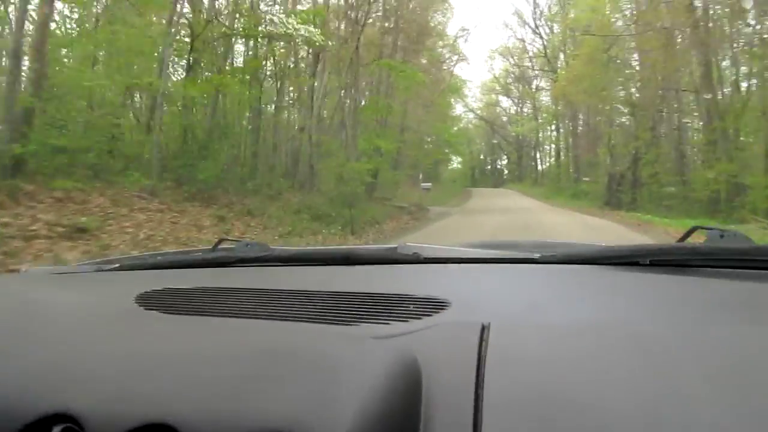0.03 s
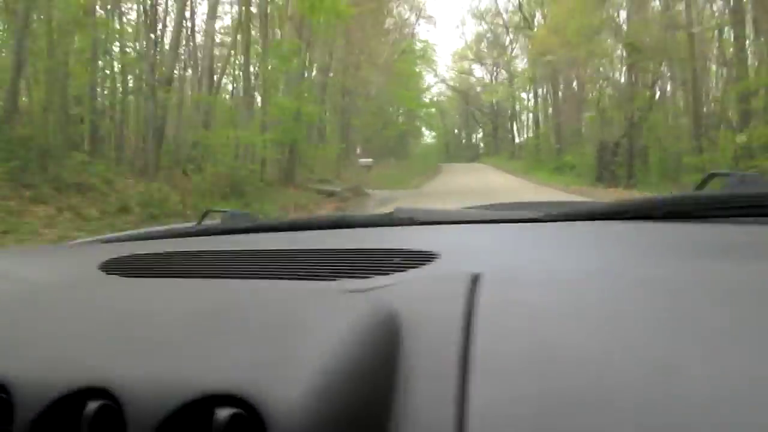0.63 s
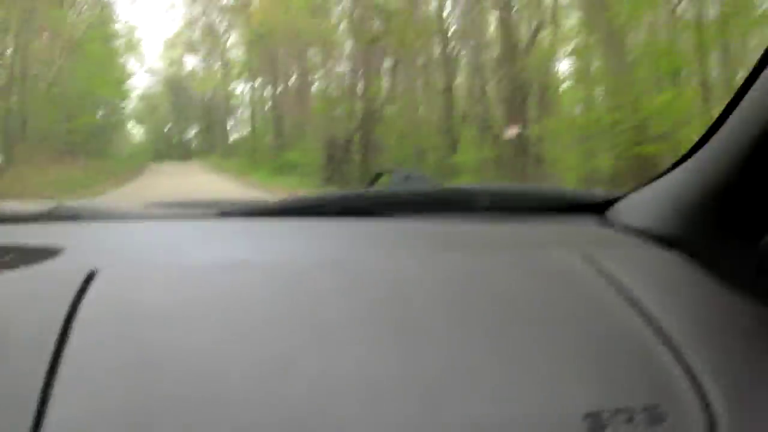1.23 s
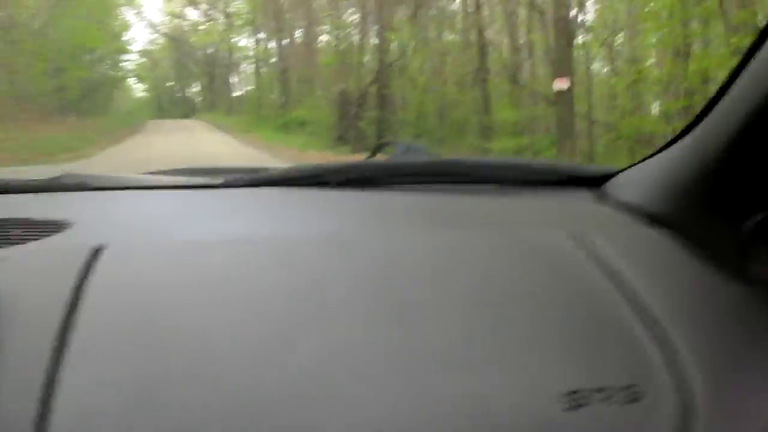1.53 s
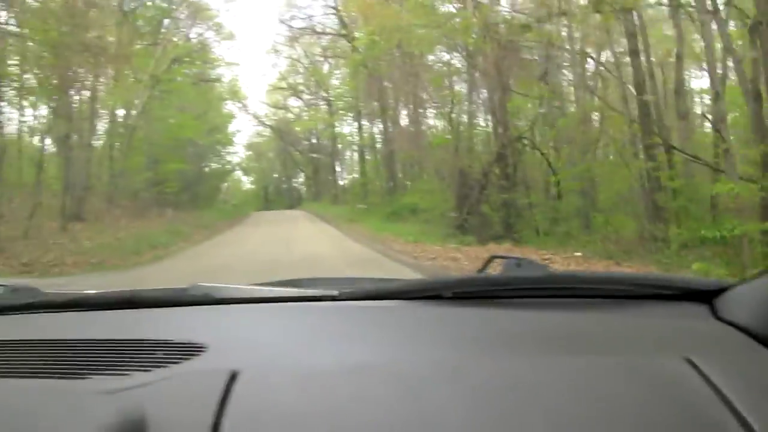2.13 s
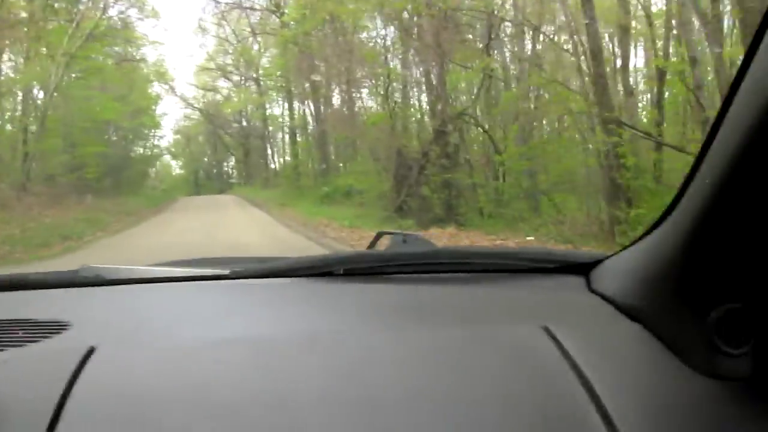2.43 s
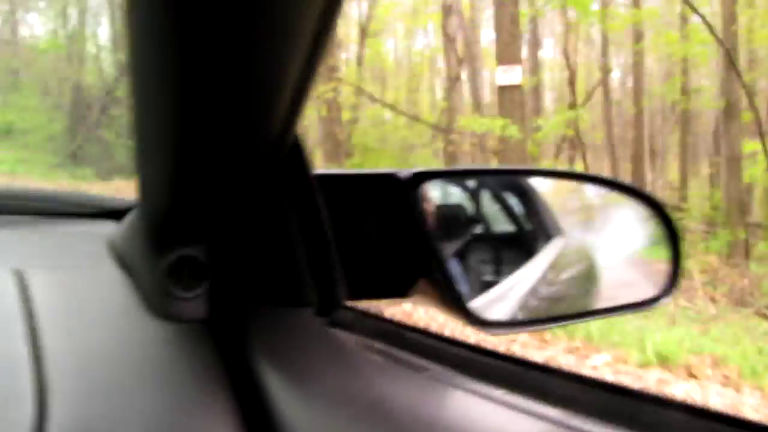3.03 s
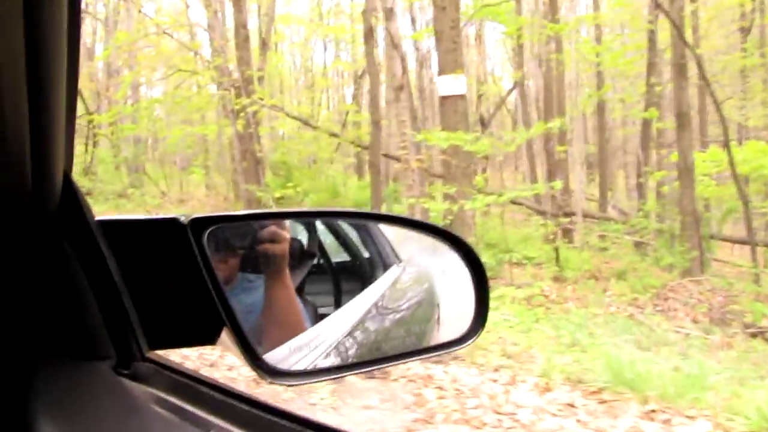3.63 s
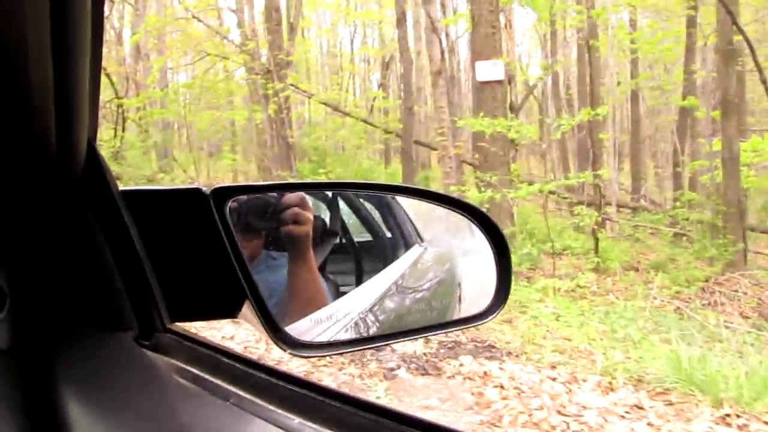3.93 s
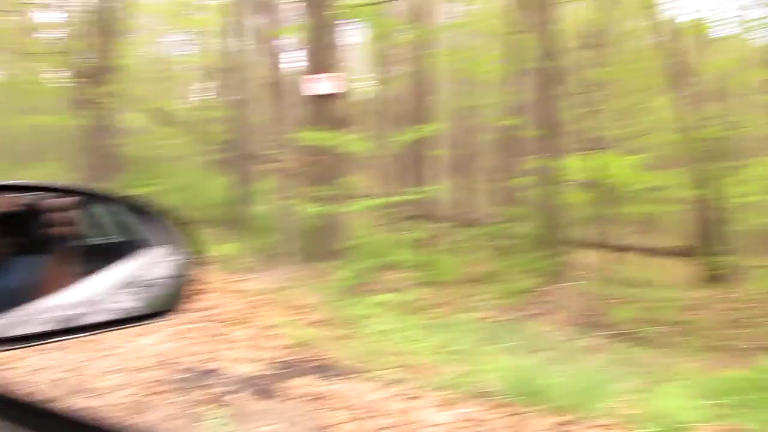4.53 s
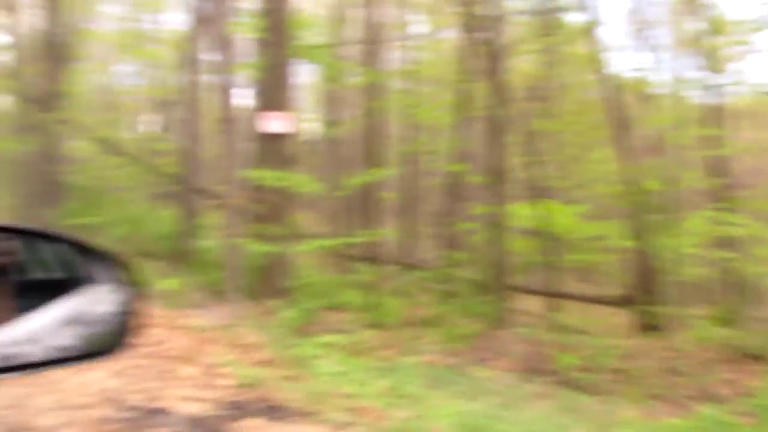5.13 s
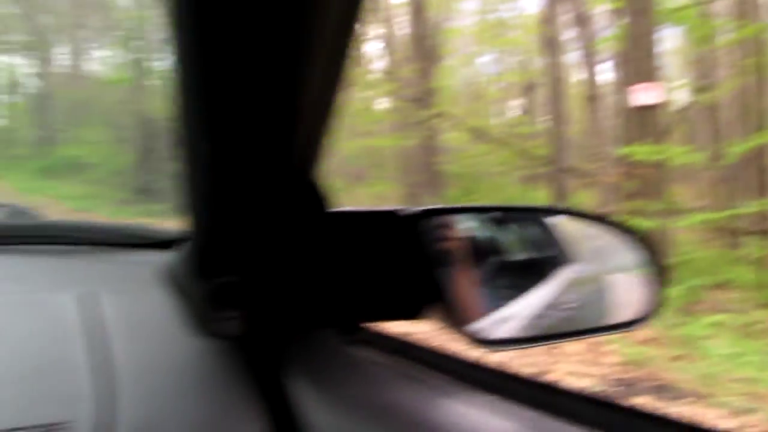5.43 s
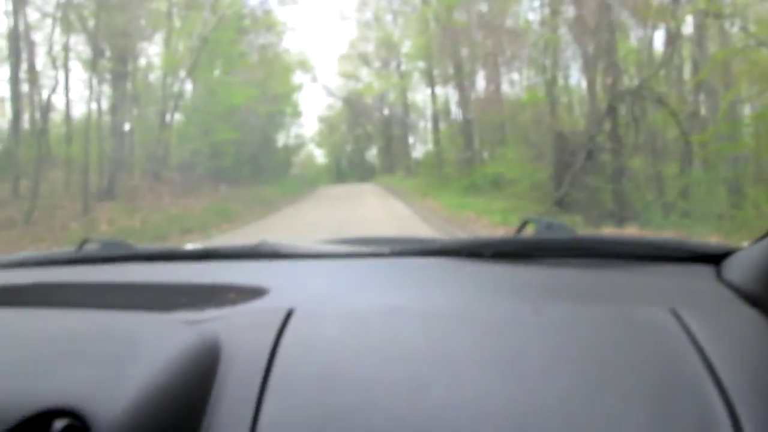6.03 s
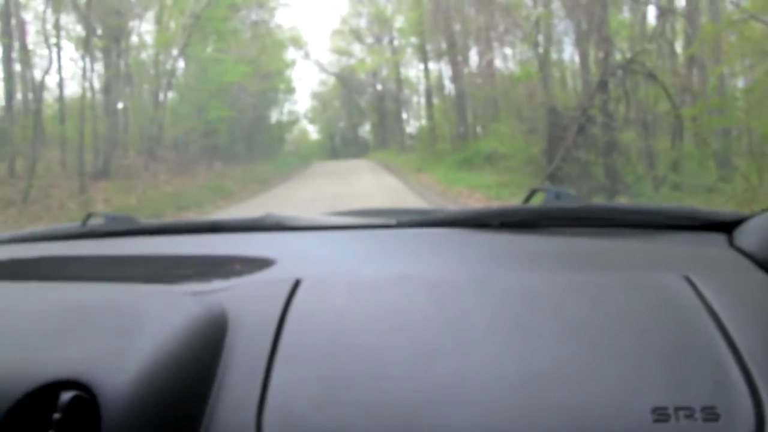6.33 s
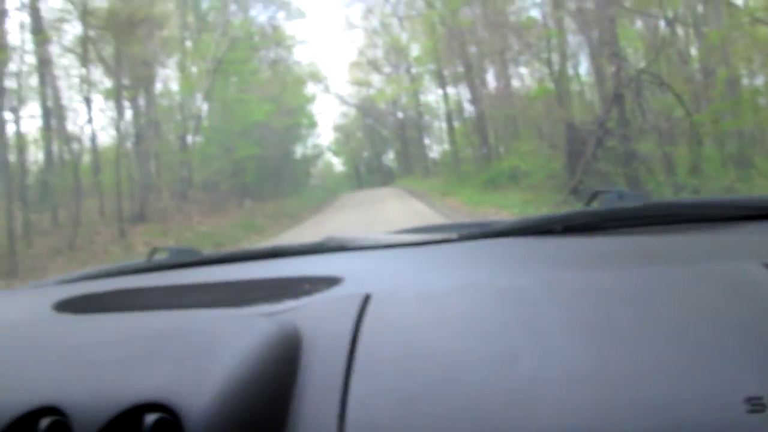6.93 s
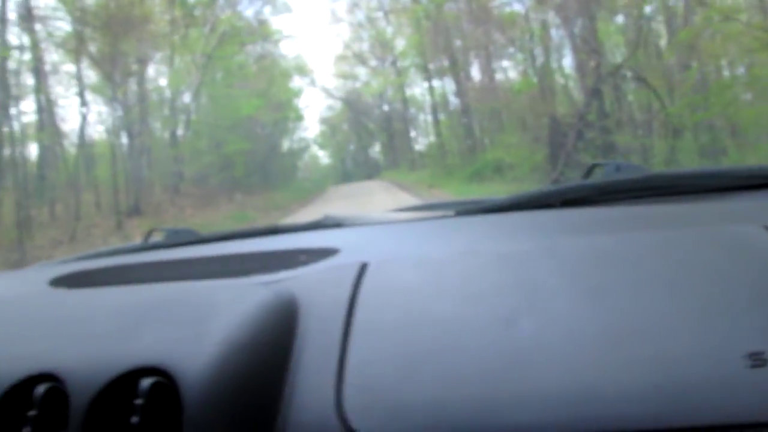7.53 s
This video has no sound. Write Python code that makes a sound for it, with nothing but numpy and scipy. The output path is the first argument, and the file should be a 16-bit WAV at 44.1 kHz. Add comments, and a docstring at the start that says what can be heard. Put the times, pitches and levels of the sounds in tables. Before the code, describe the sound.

A V8 engine is heard from inside a slowly moving car with the window open. It opens on a loud, raspy throttle blip that distorts and dies away by about 0.3 seconds, leaving a deep, loping exhaust rumble that continues throughout. Loose plastic trim clicks sharply at 0.4 and 0.8 seconds, the second time with a tiny metallic ping, and smaller clicks follow until about 3 seconds. Between 1 and 1.8 seconds the engine picks up slightly and hard beats tick in the microphone. Tyres hiss and crunch faintly on gravel underneath. The engine sinks to its slowest near 4.5 seconds, then rises and booms louder around 5.3 seconds. It holds a faster, rougher throb to the end near 7.8 seconds, with irregular overload ticks. A hand rubs softly on the camera from about 3.7 to 5 seconds and again from 6 seconds.

```python
"""A V8 exhaust booms in the cabin of a car creeping over gravel, heard with the window open.
A throttle blip howls, rasps and dies away; then unequal firing pulses excite the resonances of pipe
and cabin in a loping beat that now and then overloads the microphone. Hard firings tick.
Tyres hiss and crunch, loose trim clicks, a metal piece pings and a hand rubs on a camera shell."""
import sys
import numpy as np
from scipy import signal
from scipy.io import wavfile
from scipy.ndimage import uniform_filter1d, minimum_filter1d

SR = 44100
rng = np.random.default_rng(int(sys.argv[2]) if len(sys.argv) > 2 else 0)


def transcribe(u):
    """Save the signal u as a 16-bit wav file named by the first command-line argument.

    u: samples, shape (n,) or (channels, n), limited to [-1, 1]; the rate is SR.
    q: integer samples, one column per channel.
    """
    v = np.clip(np.atleast_2d(u).T, -1, 1)
    q = np.round(v * 32767).astype(np.int16)
    wavfile.write(sys.argv[1], SR, q)


N = 342657
TIME = np.arange(N) / SR
OVERLOAD = .53  # the microphone's limit, share of full scale
REFERENCE_RPM, CRAWL_RPM, FAST_RPM = 1700, 1400, 2040

# Levels in the tables are relative: each source applies its own gain.
# Likeness of left and right noise: frequency_hz, correlation
STEREO_CORRELATION = [(300, 0.8), (700, 0.73), (1400, 0.29), (2800, 0.1), (5000, 0.039)]
# Rolling noise of the tyres: time_s, level_db
TYRE_LEVELS = [(0.4, -47.5), (1.06, -48), (1.96, -55), (2.9, -50), (3.4, -49.5), (4.45, -45), (5.5, -48.5),
               (5.9, -50.5), (7.1, -52), (7.77, -49)]
# Spectrum of the gravel hiss: frequency_hz, density_db
GRAVEL_SPECTRUM = [(530, -29), (900, 1), (1000, -17.5), (1270, -8), (1710, -12), (2170, -11), (2510, -15),
                   (3070, -17), (4390, -20.5), (5440, -25), (10200, -34), (14400, -50), (15500, -58)]
# Strokes of the hand: start_s, level_db, length_s, upper_modes_db
HAND_STROKES = [(3.745, -44, 0.05, -4), (3.698, -57, 1, -1), (4.204, -51.5, 0.2, -5),
                (4.347, -50.5, 0.44, 0), (4.7, -56, .6, -5.5), (5.93, -55, 0.045, -2),
                (6.07, -50, 0.046, -4), (6.155, -43.5, 0.11, -6), (6.4, -50, 0.086, -6),
                (6.56, -55, 0.024, -2), (6.5, -58.5, 0.6, -2.5), (7.226, -52, 0.035, -7),
                (7.36, -51.5, 0.05, -2.5), (7.47, -50.5, 0.18, -8), (7.62, -55, 0.14, -2.5)]
# Modes of the camera shell: pitch_hz, width_hz, gain_db
SHELL_MODES = [(2505, 140, 1), (2940, 74, -4), (3280, 78, -4.5), (3660, 170, 3.5), (4160, 140, -0.5),
               (4330, 120, 3.5), (4700, 92, 0.5), (5160, 100, -8.5), (5550, 96, -10.5), (7100, 130, -14.5)]
# Impacts on a small metal piece: start_s, level_db
METAL_IMPACTS = [(.46, -70), (0.797, -44)]
# Modes of the metal piece: pitch_hz, gain_db, t60_s
METAL_MODES = [(5500, -4, 0.12), (10110, 0.5, 0.1), (11510, -21.5, .2), (15500, -24, .12)]
# Impacts of loose trim: start_s, level_db, t60_s, pan_db
TRIM_IMPACTS = [(0.43, -23, 0.053, 2.5), (0.784, -21, 0.057, 9.5), (0.845, -36, 0.19, 0.5),
                (1.079, -37.5, 0.35, 6), (1.131, -31, 0.08, 0), (1.571, -43.5, 0.081, -5),
                (1.752, -39.5, 0.098, 1.5), (2.32, -42, 0.24, -0.5), (3.083, -32.5, 0.11, 1.5)]
# Modes of the plastic trim: pitch_hz, width_hz, gain_db
PLASTIC_MODES = [(1620, 300, 22.5), (2010, 820, 5), (3500, 790, 8.5), (4070, 200, -19), (5700, 230, -28.5),
                 (8600, 1000, -31.5), (11000, 4000, -17)]
# Crankshaft speed: time_s, speed_rpm
CRANK_SPEED = [(0.0, 3010), (0.09, 2850), (0.23, 2087), (0.51, 1362), (0.85, 1683), (1.13, 1822),
               (1.35, 1806), (2.05, 1642), (2.6, 1600), (3.15, 1638), (3.37, 1581), (3.7, 1442),
               (4.15, 1420), (4.49, 1237), (4.91, 1480), (5.35, 1975), (5.65, 2068), (5.95, 2040),
               (6.42, 1933), (6.85, 1917), (7.13, 1845), (7.43, 1892), (7.77, 1841)]
# Unsteady combustion, as the relative spread of firing strength: time_s, spread
FIRING_SPREAD = [(0, 0.5), (.45, 0.5), (.8, 0.25), (3.2, 0.16), (3.7, 0.26), (4.5, 0.5), (5.0, 0.2),
                 (5.6, 0.25), (6.1, 0.46), (7.77, 0.42)]
# Cylinders in firing order: strength_db, offset_ms
FIRING_ORDER = [(-1, -11.71), (-4.6, -13.44), (-2.6, -12.11), (2.5, -11.58), (-.6, -14.23), (-.5, -11.4),
                (-3.8, -12), (1.7, -12.98)]
# Single hard firings that overload the microphone: start_s, level_db
OVERLOAD_PEAKS = [(0.186, -29), (0.236, -28), (0.244, -30), (0.349, -28), (1.026, -32), (1.092, -29),
                  (1.159, -28), (1.225, -27), (1.291, -26.5), (1.357, -26.5), (1.424, -26), (1.491, -28),
                  (1.56, -29), (1.628, -29), (1.698, -31), (1.767, -33), (1.838, -35), (5.15, -31),
                  (5.176, -30), (5.286, -25), (5.387, -28), (5.477, -30), (5.638, -28), (5.665, -31),
                  (5.747, -31), (5.805, -33), (5.816, -32), (5.873, -29), (5.991, -26), (6.05, -33),
                  (6.075, -30), (6.354, -27), (6.442, -30), (6.477, -26), (6.601, -25), (6.628, -33),
                  (6.815, -31), (6.913, -31), (6.986, -33), (7.04, -32), (7.104, -30), (7.133, -27),
                  (7.427, -28), (7.454, -30), (7.489, -31), (7.554, -26), (7.618, -27), (7.748, -30)]
# Strength of the exhaust: time_s, boom_db, rush_db
EXHAUST_LEVELS = [(0, -18, -30), (0.15, -2, -46), (0.27, -16.5, -56), (0.42, -14, -57), (0.48, -19, -55.5),
                  (0.62, -14, -57), (0.95, -12, -52.5), (1.3, -13, -53.5), (2.15, -13.5, -60),
                  (3.04, -12, -54), (3.4, -14.5, -55), (4.25, -13.5, -52.5), (4.65, -16, -52.5),
                  (4.88, -10.5, -52.5), (5.3, -9, -48), (6.05, -14, -57), (7.77, -13, -58)]
# Left-right balance of the boom as the camera turns: time_s, pan_db
BOOM_PAN = [(0, .3), (.7, 1.1), (2.5, 1.5), (4.3, 1.9), (5.3, 1.2), (7.77, 1.1)]
# Spectrum of the rushing gas: frequency_hz, density_db
RUSH_SPECTRUM = [(250, -6.5), (420, -2), (520, -8), (670, -6.5), (900, -10.5), (1150, -23), (1800, -27),
                 (4000, -43)]
# Partials of the howl: multiple_of_cycle_rate, gain_db
HOWL_PARTIALS = [(8, 0), (11, -9), (5, -19)]
# Higher cabin modes: pitch_hz, width_hz, gain_db
UPPER_CABIN_MODES = [(550, 13, -9.5), (610.5, 24, 1), (652.5, 12, 6.5), (702, 17, 2), (774, 15, -5.5),
                     (912, 8.9, -1), (936.5, 10, -7)]
# Cabin modes that grow with engine speed: pitch_hz, width_hz, slope_db_per_100_rpm
CABIN_DRONE_MODES = [(208, 16, 1.08), (330, 26, 2.0), (418, 37, 1.3)]
# Low modes of tailpipe and cabin: pitch_hz, width_hz, gain_db, polarity
PIPE_CABIN_MODES = [(68, 14.6, 6.5, -1), (88.6, 20.2, 3, -1), (120.5, 39, 1, 1), (188.2, 26.1, 1.65, 1),
                    (199.1, 9.4, -8, 1), (235.6, 13.1, 2.6, -1), (280.8, 25, -10, 1),
                    (321.8, 20.5, -7.5, 1), (359.1, 16, -8, -1), (391.7, 24, -12.5, 1), (428, 14, -19, 1)]


def from_db(db):
    """Amplitude ratio of a level in decibels."""
    return 10 ** (np.asarray(db) / 20)


def unit_rms(x):
    """Normalisation to unit mean power."""
    return x / np.sqrt(np.mean(x ** 2) + 1e-20)


def in_time(rows, at=TIME):
    """Linear interpolation of a table's columns in time."""
    times, *columns = np.transpose(rows)
    return [np.interp(at, times, column) for column in columns]


def at_hz(rows, hz):
    """Interpolation of a spectrum on a log-frequency axis."""
    frequencies, values = np.transpose(rows)
    return np.interp(np.log(hz), np.log(frequencies), values)


def panned(x, pan_db):
    """Localisation by level difference, left minus right."""
    return x * from_db(np.array([[.5], [-.5]]) * pan_db)


def stereo(mid, side):
    """Sum and difference give the left and right channels."""
    return mid + side * [[1], [-1]]


def cut(x, hz, kind, order=2):
    """Butterworth filter, maximally flat in its passband."""
    return signal.sosfilt(signal.butter(order, hz, kind, fs=SR, output="sos"), x)


def drift(rate_hz):
    """Random fluctuation: interpolation between values of unit variance."""
    knots = unit_rms(rng.standard_normal(4000))
    return np.interp(TIME * rate_hz, np.arange(len(knots)), knots)


def decay(start_s, t60_s, rise_s):
    """Exponential damping after a quick rise: 60 dB lost in t60_s."""
    age = np.clip(TIME - start_s, 0, 2 * t60_s)
    return (1 - np.exp(-age / rise_s)) * np.exp(-np.log(1000) * age / t60_s)


def resonance(x, hz, width_hz):
    """Damped resonator: a two-pole band-pass of unit peak gain."""
    radius = np.exp(-np.pi * width_hz / SR)
    feedback = [1, -2 * radius * np.cos(2 * np.pi * hz / SR), radius ** 2]
    return signal.lfilter(np.array([1, 0, -1]) * (1 - radius ** 2) / 2, feedback, x + 1e-18)


def modal_response(force, modes):
    """Superposition of a body's driven modes, at unit power."""
    return unit_rms(sum(from_db(db) * resonance(force, hz, width) for hz, width, db in modes))


def modal_noise(modes):
    """Broadband excitation of a body's modes, in stereo."""
    return modal_response(rng.standard_normal((2, N)), modes)


def banded_noise(spectrum, low_hz, high_hz, flicker_db=0, bands=12):
    """Partly coherent stereo noise of unit power, each band with its own level and correlation."""
    noise, edges = 0, np.geomspace(low_hz, high_hz, bands + 1)
    white = rng.standard_normal((2, 2, N))
    for k, band in enumerate(zip(edges, edges[1:])):
        mid, side = cut(white[k % 2], band, "band")
        centre_hz = np.sqrt(band[0] * band[1])
        correlation = at_hz(STEREO_CORRELATION, centre_hz)
        gain = from_db(at_hz(spectrum, centre_hz) + flicker_db * drift(25))
        noise += gain * stereo(np.sqrt(1 + correlation) * mid, np.sqrt(1 - correlation) * side)
    return unit_rms(noise)


def tyres(stones_per_s=220, crunch=.35, gain_db=-4):
    """Amplitude modulation: single stones shift at random and roughen the gravel hiss."""
    stones = (rng.random(N) < stones_per_s / SR) * rng.exponential(1, N)
    grain = unit_rms(cut(stones, 270, "low"))
    hiss = banded_noise(GRAVEL_SPECTRUM, 1034, 16000, flicker_db=-.5)
    return from_db(in_time(TYRE_LEVELS)[0] + gain_db) * unit_rms((1 + crunch * grain) * hiss)


def hand_rubs(rise_share=.24, grip_db=-68, lowest_mode_db=-6.5, rough_db=4.5):
    """Friction: skin slips unevenly on the camera shell and excites its modes."""
    low_drive, upper_drive = from_db(grip_db), 0
    for start, db, length, upper_db in HAND_STROKES:
        stroke = from_db(db) * np.interp(TIME, [start, start + rise_share * length, start + length],
                                         [0, 1, 0])
        low_drive += stroke
        upper_drive += from_db(upper_db) * stroke
    low = low_drive * from_db(lowest_mode_db) * modal_noise(SHELL_MODES[:1])
    upper = upper_drive * modal_noise(SHELL_MODES[1:])
    return panned((low + upper) * from_db(rough_db * drift(180)), pan_db=4.5)


def metal_pings():
    """Free vibration: a struck metal piece rings in a few high, damped modes."""
    ring = sum(from_db(db + mode_db) * decay(start, t60, rise_s=.002) * np.sin(2 * np.pi * hz * TIME)
               for start, db in METAL_IMPACTS for hz, mode_db, t60 in METAL_MODES)
    return panned(ring, pan_db=8)


def trim_clicks(gain_db=-7, rise_s=.0016, tail_db=-19, tail_t60_s=.34):
    """Impact and reverberation: loose plastic chatters and the cabin carries a faint tail."""
    envelope = 0
    for start, db, t60, pan_db in TRIM_IMPACTS:
        tail = from_db(tail_db) * decay(start, tail_t60_s, rise_s)
        envelope += panned(from_db(db + gain_db) * (decay(start, t60, rise_s) + tail), pan_db)
    return envelope * modal_noise(PLASTIC_MODES)


def body_shake(base_db=-21, db_per_rpm=-.01, width=.25):
    """Forced vibration: the body rumbles in proportion to uneven firing, less at higher speed."""
    mid, side = cut(rng.standard_normal((2, N)), [42, 66], "band")
    excess_rpm = np.minimum(in_time(CRANK_SPEED)[0], FAST_RPM) - REFERENCE_RPM
    amplitude = from_db(base_db + db_per_rpm * excess_rpm) * in_time(FIRING_SPREAD)[0]
    return amplitude * unit_rms(stereo(mid, width * side))


def overload_ticks(flat_s=.0011, dull_hz=900, width=.25, gain_db=1.5, knock_per_spread=11):
    """Saturation: a flattened peak snaps on entry and exit; uneven running deepens the knock."""
    edges = np.zeros((2, N))
    for start, db in OVERLOAD_PEAKS:
        stretch, side = rng.standard_normal(2)
        edge_s = start + flat_s * np.array([1, 2 + .2 * stretch])
        samples = np.clip(edge_s * SR, 0, N - 1).astype(int)
        edges[:, samples] += from_db(db + gain_db) * np.outer([1 + width * side, 1 - width * side], [1, .6])
    snap = signal.lfilter([1], [1, -np.exp(-2 * np.pi * dull_hz / SR)], edges + 1e-18)
    knock = knock_per_spread * in_time(FIRING_SPREAD)[0] * cut(snap, dull_hz, "low")
    return cut(cut(snap, 4000, "low", order=1) + knock, 300, "high")


def limiter(x):
    """Peak limiting: the gain dips briefly around pressure peaks above the overload level."""
    safe_gain = OVERLOAD / np.maximum(np.abs(x), OVERLOAD)
    held_gain = minimum_filter1d(safe_gain, size=600)
    return x * uniform_filter1d(uniform_filter1d(held_gain, size=300), size=300)


def gas_rush(pulses, level_db, throb=.19, gain_db=12):
    """Turbulence: the noise of the gas swells a little with every firing."""
    puffs = unit_rms(np.abs(cut(pulses, 120, "low")))
    turbulence = banded_noise(RUSH_SPECTRUM, 282, 3296)
    return from_db(level_db + gain_db) * unit_rms((1 + throb * puffs) * turbulence)


def blip_rasp(start_db=-24, hold_s=.085, fall_db_per_s=105, width=.6):
    """Flow noise: the throttle blip tears gas through the pipe in a hiss that holds, then dies."""
    level_db = start_db - fall_db_per_s * np.clip(TIME - hold_s, 0, 1)
    hiss = cut(rng.standard_normal((2, N)), [650, 1700], "band", order=1)
    mid, side = cut(hiss, 4800, "low", order=1)
    return from_db(level_db) * unit_rms(stereo(mid, width * side))


def engine_cycles(lag_cycles=.072):
    """Phase as the integral of speed, in engine cycles of two crank turns."""
    return np.cumsum(in_time(CRANK_SPEED)[0]) / (2 * 60 * SR) - lag_cycles


def blip_howl(start_db=9, hold_s=.05, fall_db_per_s=190, waver_db=2.5):
    """Pipe resonance: at the top of the blip the firing rate sounds as a strong, loping tone."""
    cycles = engine_cycles()
    tone = sum(from_db(db) * np.sin(2 * np.pi * order * cycles) for order, db in HOWL_PARTIALS)
    level_db = start_db - fall_db_per_s * np.clip(TIME - hold_s, 0, 1)
    return from_db(level_db + waver_db * drift(90)) * tone


def cabin_growl(pulses, level_db, gain_db=5.5):
    """Impulse excitation: the sharp edge of each firing rings the higher cabin modes."""
    return from_db(level_db + gain_db) * modal_response(pulses, UPPER_CABIN_MODES)


def cabin_drone(boom):
    """Resonant emphasis: the boom's upper bands swell with speed and sink at a crawl."""
    excess_rpm = np.clip(in_time(CRANK_SPEED)[0], CRAWL_RPM, FAST_RPM) - REFERENCE_RPM
    return boom + sum((from_db(slope * excess_rpm / 100) - 1) * resonance(boom, hz, width)
                      for hz, width, slope in CABIN_DRONE_MODES)


def firings(jitter_ms_per_spread=.4):
    """Quasi-periodic pulse train, eight pulses a cycle; unequal pipes make the beat lope."""
    cycles, cylinders = engine_cycles(), len(FIRING_ORDER)
    number = np.arange(np.ceil(cycles[0] * cylinders), cycles[-1] * cylinders).astype(int)
    even_s = np.interp(number / cylinders, cycles, TIME)
    strength_db, offset_ms = np.array(FIRING_ORDER)[number % cylinders].T
    spread = in_time(FIRING_SPREAD, even_s)[0]
    timing_scatter, strength_scatter = spread * rng.standard_normal((len(number), 2)).T
    arrival_s = even_s + (offset_ms + jitter_ms_per_spread * timing_scatter) / 1000
    pulses = np.zeros(N)
    pulses[np.clip(arrival_s * SR, 0, N - 1).astype(int)] = from_db(strength_db) * (1 + strength_scatter)
    return pulses


def exhaust_boom(pulses, level_db, muffler_hz=352.5):
    """Source and filter: the pulses ring in pipe and cabin, and the muffler acts as a low-pass."""
    ring = sum(polarity * from_db(db) * resonance(pulses, hz, width)
               for hz, width, db, polarity in PIPE_CABIN_MODES)
    muffled = cut(ring, muffler_hz, "low", order=4)
    local_power = uniform_filter1d(uniform_filter1d(muffled ** 2, size=6000), size=3200)
    return from_db(level_db) * muffled / np.sqrt(np.abs(local_power) + 1e-16)


def scene():
    """Superposition of the exhaust, which saturates the microphone, and the small sounds around it."""
    boom_db, rush_db = in_time(EXHAUST_LEVELS)
    pulses, pan_db = firings(), in_time(BOOM_PAN)[0]
    rumble = limiter(cabin_drone(exhaust_boom(pulses, boom_db)) + body_shake())
    exhaust = panned(rumble + blip_howl(), pan_db) + blip_rasp() + cabin_growl(pulses, rush_db)
    # the howl drives the microphone to its limit and comes out as a square-edged buzz
    limit = panned(OVERLOAD, pan_db)
    engine = np.clip(exhaust, -limit, limit) + overload_ticks() + gas_rush(pulses, rush_db)
    return engine + tyres() + trim_clicks() + metal_pings() + hand_rubs()


def record(dry, low_hz=11, high_hz=15800):
    """Band limiting: a gentle high-pass and a steep elliptic low-pass."""
    low_pass = signal.ellip(10, .1, 80, high_hz, fs=SR, output="sos")
    return signal.sosfilt(low_pass, cut(dry, low_hz, "high", order=1))


dry = scene()
out = record(dry)
transcribe(out)
```